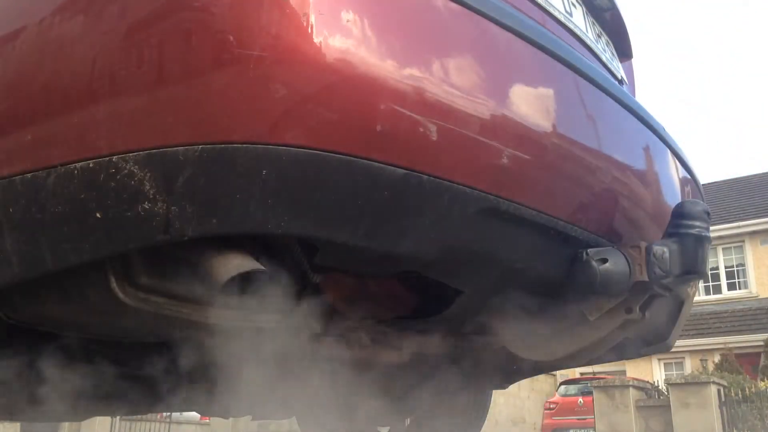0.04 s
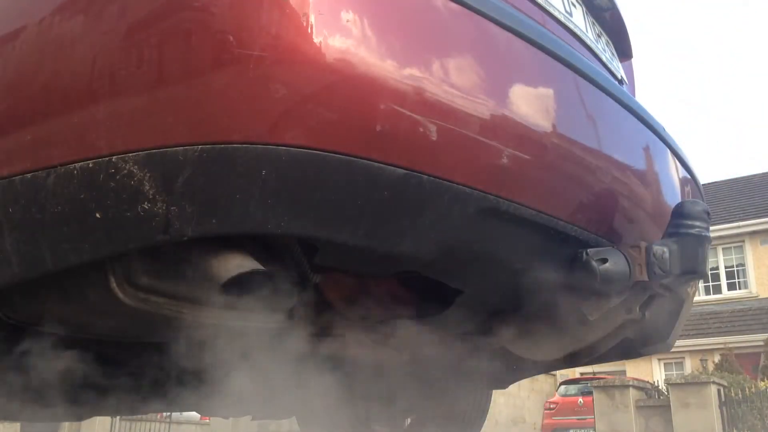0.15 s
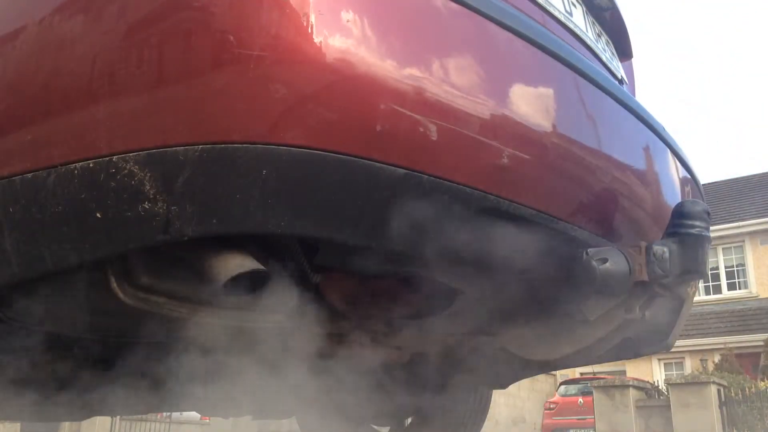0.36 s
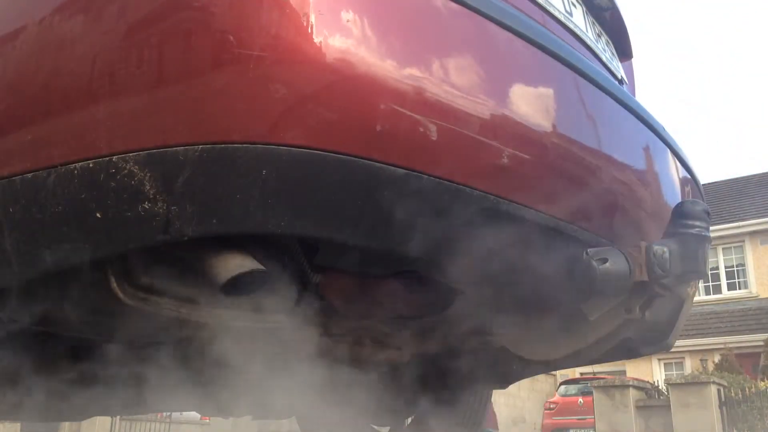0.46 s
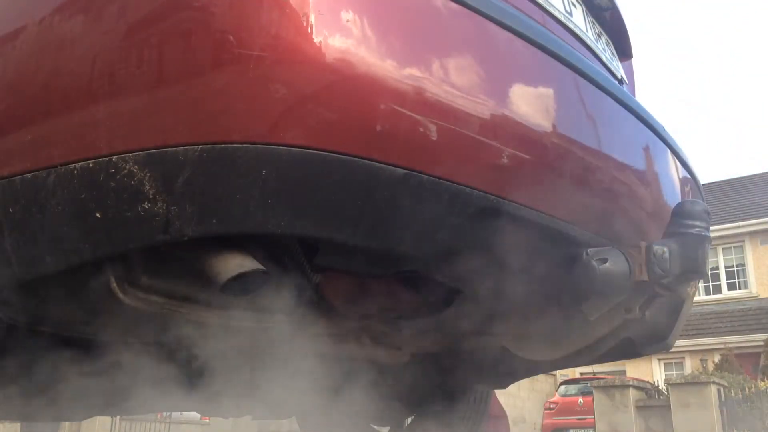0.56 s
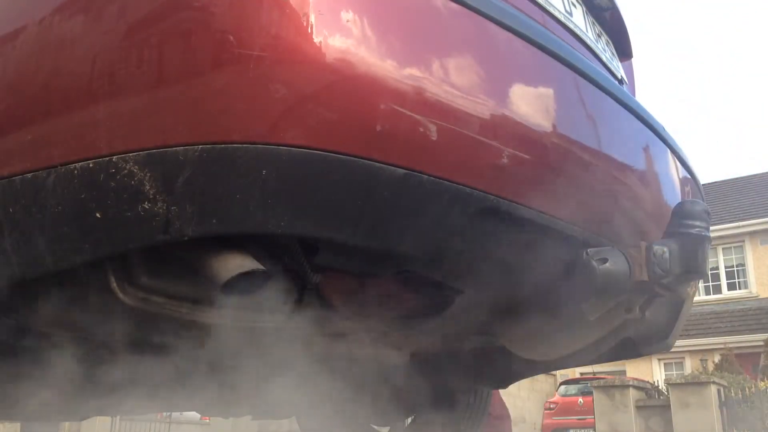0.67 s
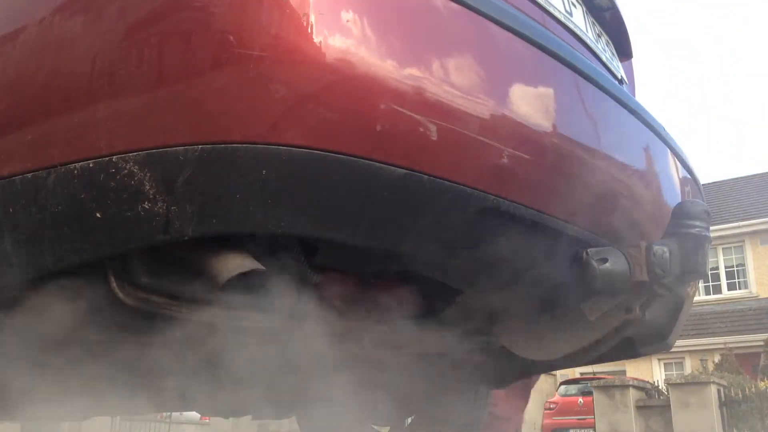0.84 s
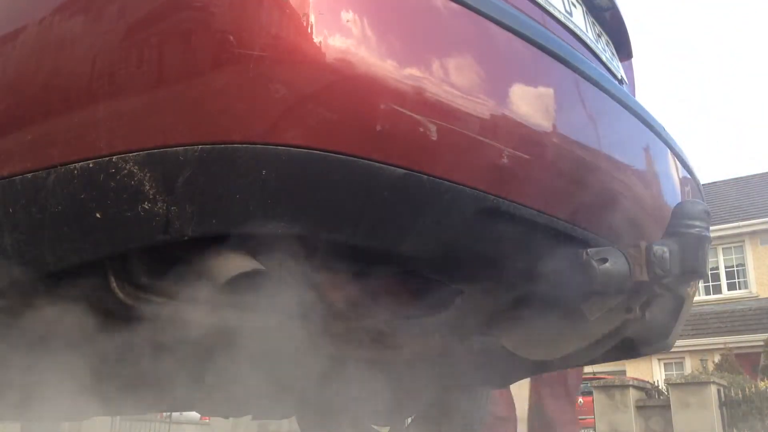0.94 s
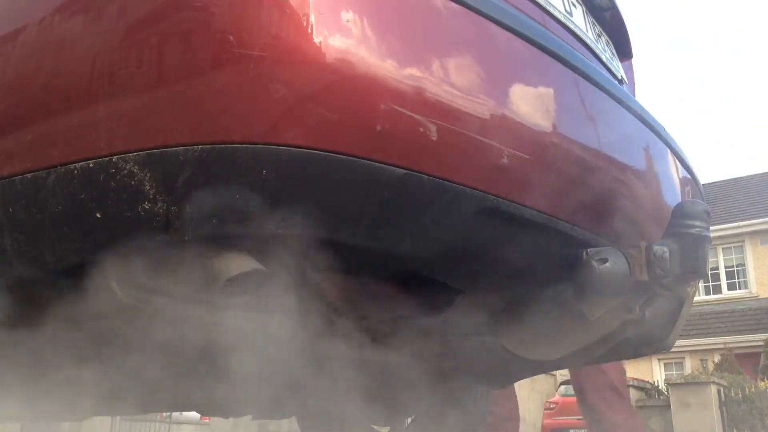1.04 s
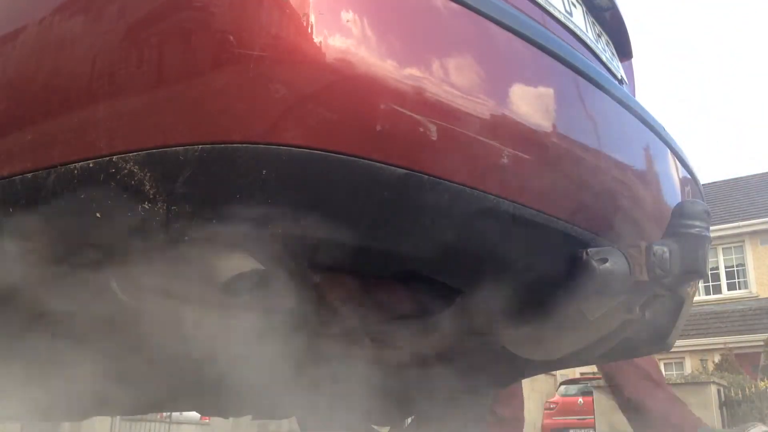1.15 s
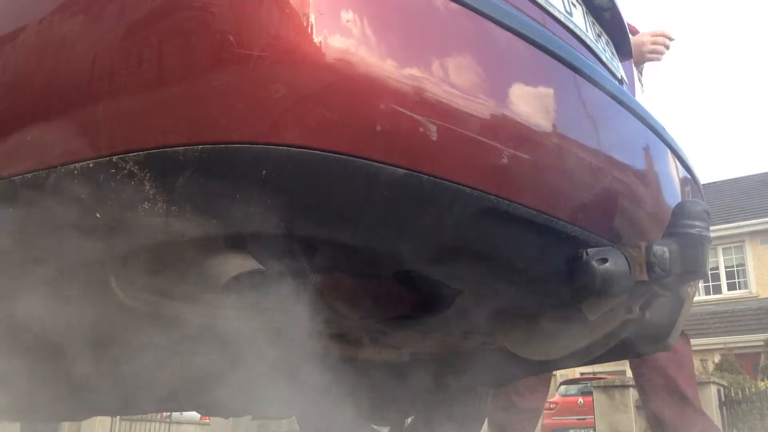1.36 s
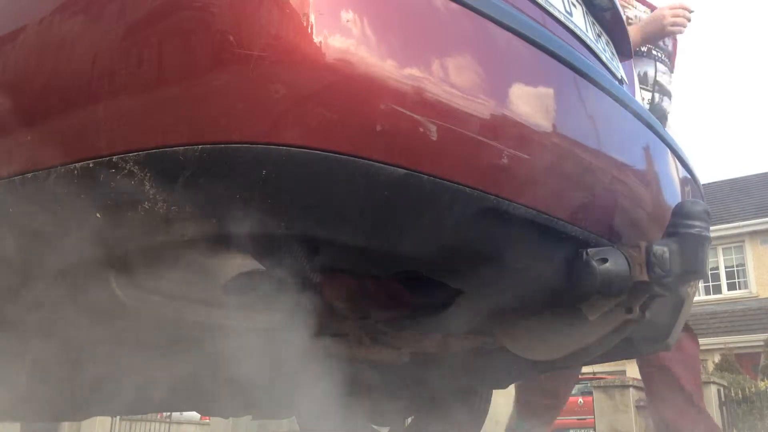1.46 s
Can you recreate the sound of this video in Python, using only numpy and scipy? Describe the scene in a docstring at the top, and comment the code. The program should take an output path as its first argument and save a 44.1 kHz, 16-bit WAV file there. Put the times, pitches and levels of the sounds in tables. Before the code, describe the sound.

Car engine idling, heard close at the tailpipe, with one dull stumbling thump early on

```python
"""Idling car and a dull thump

A car idles in a street, heard close to its tailpipe. Rounded pulses make a soft puff for each firing,
and two sine waves make the pipe hum. Shaped noise makes a steady rush of gas; narrow bands of noise
make thin whines and light clatter. Something loose gives short, rough buzzes now and then.
Early on comes one dull, stumbling thump, probably a door being shut: pushes that ring a car body."""
import sys
import numpy as np
from scipy import signal
from scipy.fft import rfft, irfft
from scipy.io import wavfile
from scipy.ndimage import uniform_filter1d

SR = 44100
rng = np.random.default_rng(int(sys.argv[2]) if len(sys.argv) > 2 else 0)


def put_to_file(sound):
    """Save the sound as 16-bit audio at rate SR, in the file named by the first command-line argument."""
    columns = np.atleast_2d(sound).T  # one column per channel
    safe = np.clip(columns, -1, 1)
    whole_steps = np.round(safe * 32767)
    wavfile.write(sys.argv[1], SR, whole_steps.astype(np.int16))


N = 66150  # length in samples
TIME = np.arange(N) / SR  # seconds


def from_db(db):
    """Turn decibels into a gain."""
    return 10 ** (np.asarray(db) / 20)


def over_time(table):
    """Draw straight lines between the (time [s], value) points of a table."""
    times, values = np.transpose(table)
    return np.interp(TIME, times, values)


def rms_one(x):
    """Scale a sound to an rms (average strength) of 1."""
    return x / np.sqrt(np.mean(x ** 2) + 1e-20)


def coloured(x, spectrum):
    """Shape a sound by a (frequency [Hz], level [dB]) curve, then scale it to rms 1."""
    hz, db = np.transpose(spectrum)
    # twice the length, so that the end does not wrap round to the start
    bins = np.maximum(np.arange(N + 1) * SR / (2 * N), 1)
    gain = from_db(np.interp(np.log(bins), np.log(hz), db))
    shaped = irfft(rfft(x, 2 * N) * gain)[:N]
    return rms_one(shaped)


def narrow_noise(hz, width_hz):
    """Noise through a steep resonance, halved in height width_hz from its centre; rms 1."""
    bins = np.arange(N // 2 + 1) * SR / N
    resonance = 1 / (1 + ((bins - hz) / width_hz) ** 2)
    return rms_one(irfft(rfft(rng.standard_normal(N)) * resonance, N))


def low_cut(x, hz):
    """Take away the sound below a frequency."""
    return signal.sosfilt(signal.butter(2, hz, "high", fs=SR, output="sos"), x)


# How fast the engine fires: (time [s], firing rate [Hz])
FIRING_RATE = [(0, 35.45), (.35, 34.02), (.6, 33.51), (.95, 33.86), (1.25, 33.72), (1.5, 33.55)]
FIRST_PUFF_S = 0.00946


def firing_count():
    """Add up the firing rate into a running count that grows by 1 per firing, 0 at the first puff."""
    rate = over_time(FIRING_RATE)
    return np.cumsum(rate) / SR - FIRST_PUFF_S * rate[0]


# Colour of the rushing gas and engine: (frequency [Hz], relative level [dB per Hz])
RUSH_COLOUR = [(20, -13), (55, 2), (90, 8.5), (118, 11.5), (180, 4.5), (260, -4), (350, 3), (520, 2.5),
               (680, -3), (1150, -4), (1550, 1.5), (1780, -0.5), (2050, 3), (2600, -5.5), (3400, 0.5),
               (3950, -8.5), (4700, -5.5), (5800, -7), (7200, -15.5), (10000, -24.5), (12000, -31),
               (15000, -35)]
# Level of the rush: (time [s], level [dB])
RUSH_LEVEL = [(0, -41.5), (.35, -42.5), (.5, -43.5), (.62, -41.5), (.8, -42.5), (.95, -42), (1.25, -42),
              (1.5, -43)]
RUSH_THROB_DB, RUSH_FLICKER_DB = 0.44, 0.95  # swing with each puff, rms of the random flicker


def rush(turns):
    """Gas rushes as broad noise that flickers at random and swells a little with every puff."""
    throb_db = RUSH_THROB_DB * np.cos(2 * np.pi * turns)
    flicker_db = RUSH_FLICKER_DB * narrow_noise(4.5, 23)
    noise = rng.standard_normal(N) * from_db(throb_db + flicker_db)
    return from_db(over_time(RUSH_LEVEL)) * coloured(noise, RUSH_COLOUR)


WHINE_STEADY_S = 0.11  # the level is evened out over this time


def whine(hz, width_hz):
    """A narrow resonance flutters quickly but keeps its level in the long run; rms about 1."""
    tone = narrow_noise(hz, width_hz)
    power = uniform_filter1d(tone ** 2, int(WHINE_STEADY_S * SR))
    return tone / np.sqrt(power + 1e-12)


# Narrow ringing tones of the running engine: (frequency [Hz], width [Hz], level [dB])
WHINES = [(334, 31, -57), (862, 22, -58.5), (1431, 31, -52), (1507, 110, -59), (1723, 14, -57),
          (2419, 34, -55.5), (2730, 75, -59.5), (3405, 33, -63.5), (4464, 44, -63.5), (5040, 60, -60.5),
          (5290, 40, -53.5), (5910, 18, -66), (10780, 25, -81)]
CLATTER_HZ, CLATTER_WIDTH_HZ, CLATTER_DB = 1937, 240, -53.5
CLATTER_SWING_DB = 4  # up and down from the middle
CLATTER_LEAD = 0.14  # firing periods by which a peak comes before the puff


def machinery(turns):
    """The engine gives wavering whines and a band of noise that clatters twice per firing."""
    whines = sum(from_db(db) * whine(hz, width) for hz, width, db in WHINES)
    beat = from_db(CLATTER_SWING_DB * np.cos(2 * np.pi * 2 * (turns + CLATTER_LEAD)))
    clatter = rms_one(beat * whine(CLATTER_HZ, CLATTER_WIDTH_HZ))
    return whines + from_db(CLATTER_DB) * clatter


# Buzzes of a loose part: (time [s], level [dB], pitch [Hz])
BUZZES = [(.177, -39.5, 2056), (.207, -33.5, 2046), (.295, -44, 2051), (.426, -40, 1980),
          (0.485, -38, 1980), (.579, -37, 2008), (0.607, -38, 2062), (0.679, -40, 1950), (.736, -37, 2019),
          (.858, -32, 2024), (0.887, -35, 2046), (1.003, -38, 2040), (1.108, -40, 2067),
          (1.141, -33.5, 2024), (1.167, -33, 2013), (1.201, -38.5, 2105), (1.453, -35.5, 2013)]
BUZZ_S = 0.0023  # spread of the bell-shaped swell
BUZZ_ROUGH_HZ, BUZZ_ROUGH_WIDTH_HZ, BUZZ_ROUGH = 2050, 890, 0.1  # last: rms beside a tone of height 1


def loose_part():
    """A loose part trembles briefly: short swells of a tone with a little noise, each at its own pitch."""
    rough = BUZZ_ROUGH * narrow_noise(BUZZ_ROUGH_HZ, BUZZ_ROUGH_WIDTH_HZ)
    buzzing = np.zeros(N)
    for s, db, hz in BUZZES:
        swell = np.exp(-0.5 * ((TIME - s) / BUZZ_S) ** 2)
        buzzing += from_db(db) * swell * (np.sin(2 * np.pi * hz * TIME) + rough)
    return buzzing


def ring(force, hz, t60):
    """A force sets a fading sine going: a unit click gives height 1, down 60 dB after t60 seconds."""
    r = from_db(-60 / (t60 * SR))
    w = 2 * np.pi * hz / SR
    # the tiny offset keeps the numbers from becoming too small to compute quickly
    return signal.lfilter([0, np.sin(w)], [1, -2 * r * np.cos(w), r * r], force + 1e-18)


# Contacts of the thump, levels before the body and its overall gain act on the force:
# (time [s], push [dB], contact length [s], crunch [dB], grit [dB])
CONTACTS = [(0.219, -50, 0.00067, -36.5, -72), (0.2428, -12, 0.0059, -32, -74),
            (0.2512, -23.5, 0.0023, -43, -70), (.2555, -17.5, 0.0012, -32.5, -62),
            (0.2645, -18, 0.0072, -39, -64), (.2768, -3.5, 0.0065, -38.5, -66),
            (0.2912, -17.5, 0.00405, -39.5, -70), (0.299, -27.5, 0.0043, -61, -71),
            (.325, -20.5, 0.0052, -41, -61), (0.346, -25.5, 0.0047, -39.5, -51),
            (0.3605, -13, 0.012, -50, -59), (0.432, -22, 0.0095, -47, -72)]
# Ways the car body rings: (frequency [Hz], relative level [dB], time to fade by 60 dB [s])
BODY_MODES = [(56.7, -5.5, 0.16), (82.6, -15.5, 0.52), (110, -4, 0.06), (141, -4, 0.091), (172.8, 1, 0.12),
              (254.6, 5, 0.046), (273, -13, 0.04), (347.2, -3.5, 0.34), (512, -12.5, 0.14),
              (782, -9, 0.058), (880, -7, 0.059), (1022, -13, 0.089), (1254, -15.5, 0.11)]
BODY_DB, BODY_LOW_CUT_HZ = -2, 90
# Colour of the crunch noise: (frequency [Hz], relative level [dB per Hz])
CRUNCH_COLOUR = [(20, -50), (60, -14), (130, 1.5), (300, 3), (600, -4.5), (1100, -7), (1600, -17),
                 (2500, -16), (4000, -25.5), (9000, -39), (15000, -50)]
CRUNCH_RISE_S, CRUNCH_DECAY_S = 0.004, 0.016
RUB_DB, RUB_LOW_CUT_HZ = -21, 700  # noisy force that the crunch puts on the body
# Colour of the grit noise: (frequency [Hz], relative level [dB per Hz])
GRIT_COLOUR = [(500, -11), (1500, -7), (4000, 8), (9000, -23), (15000, -13)]
GRIT_PER_S, GRIT_DECAY_S = 7200, 0.02  # average number of grains, fading time


def thump():
    """Soft pushes ring the car body; each brings grit and a crunch that also stirs the higher modes."""
    force, crunch, grit = np.zeros((3, N))
    for s, push_db, length, crunch_db, grit_db in CONTACTS:
        age = TIME - s
        push = np.cos(np.pi * np.clip(age / length, -0.5, 0.5)) ** 2
        force += from_db(push_db) * push / push.sum()
        # the crunch grows up to the contact and fades after it
        crunch += from_db(crunch_db) * np.exp(np.minimum(age / CRUNCH_RISE_S, -age / CRUNCH_DECAY_S))
        grit += from_db(grit_db) * (age > 0) * np.exp(-np.abs(age) / GRIT_DECAY_S)
    rub = low_cut(rng.standard_normal(N), RUB_LOW_CUT_HZ)
    force += from_db(RUB_DB) * crunch * rub
    body = sum(from_db(db) * ring(force, hz, t60) for hz, db, t60 in BODY_MODES)
    body = from_db(BODY_DB) * low_cut(body, BODY_LOW_CUT_HZ)
    grains = rng.standard_normal(N) * (rng.random(N) < GRIT_PER_S / SR)
    crunching = crunch * coloured(rng.standard_normal(N), CRUNCH_COLOUR)
    return body + crunching + grit * coloured(grains, GRIT_COLOUR)


# What the silencer lets through: (frequency [Hz], relative level [dB])
SILENCER = [(18, -11), (34, -0.5), (68, 6), (100, -2), (136, -5), (170, 1), (215, -5), (340, -13),
            (600, -5), (1200, -58)]
PUFF_S, PUFF_DB = 0.01113, -41.5  # average length, rms level of all the puffs together
PUFF_SPREAD_DB, PUFF_JITTER_S = 1.6, 0.00048  # random spread of the strength and of each edge


def puffs(turns):
    """Each firing lets out a slightly uneven block of gas, rounded by the silencer."""
    flow = np.zeros(N)
    firing_times = np.interp(np.arange(int(turns[-1]) + 1), turns, TIME)
    for s in firing_times:
        strength, start_shift, end_shift = rng.standard_normal(3)
        start = s - PUFF_S / 2 + PUFF_JITTER_S * start_shift
        end = s + PUFF_S / 2 + PUFF_JITTER_S * end_shift
        # edges one sample long, so that they can fall between samples
        block = np.clip(np.minimum(TIME - start, end - TIME) * SR, 0, 1)
        flow += from_db(PUFF_SPREAD_DB * strength) * block
    return from_db(PUFF_DB) * coloured(flow - flow.mean(), SILENCER)


# Hum of the tailpipe at its lower tone: (time [s], level [dB])
PIPE_HUM_LEVEL = [(0, -56.5), (.45, -55), (.62, -46.5), (.74, -45), (.82, -59.5), (.89, -53), (1.12, -50.5),
                  (1.5, -53)]
HUM_UPPER_DB = -10.5  # upper tone against the lower


def pipe_hum(turns):
    """The tailpipe hums on the fourth and fifth multiples of the firing rate."""
    lower = -np.cos(2 * np.pi * 4 * turns)
    upper = -from_db(HUM_UPPER_DB) * np.cos(2 * np.pi * 5 * turns)
    return from_db(over_time(PIPE_HUM_LEVEL)) * (lower + upper)


def scene():
    """Add up the idling car and the thump, as one channel."""
    turns = firing_count()
    engine = rush(turns) + machinery(turns)
    exhaust = puffs(turns) + pipe_hum(turns)
    return (engine + loose_part() + thump() + exhaust)[None]


CUTOFF_HZ = 15250


def record(dry):
    """Cut the top steeply."""
    return signal.sosfilt(signal.ellip(12, 0.1, 90, CUTOFF_HZ, fs=SR, output="sos"), dry)


dry = scene()
out = record(dry)
put_to_file(out)
```